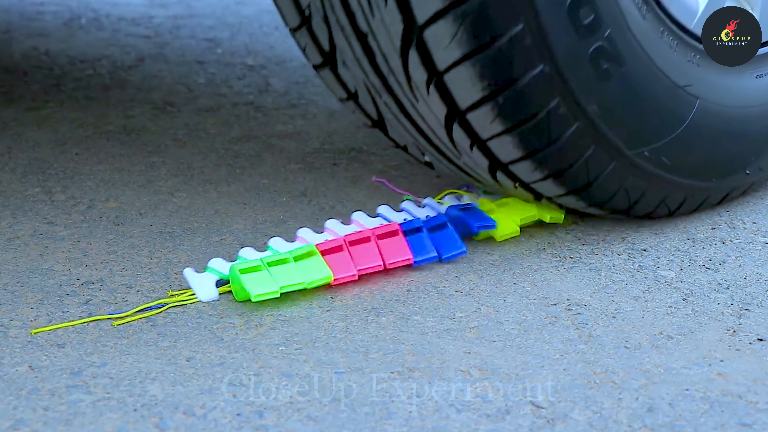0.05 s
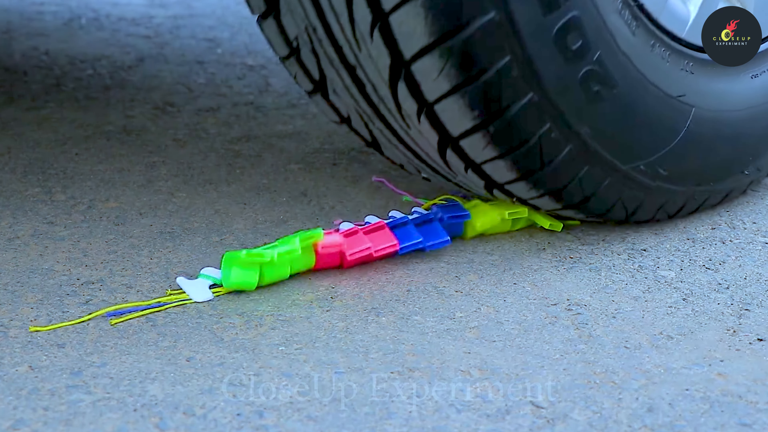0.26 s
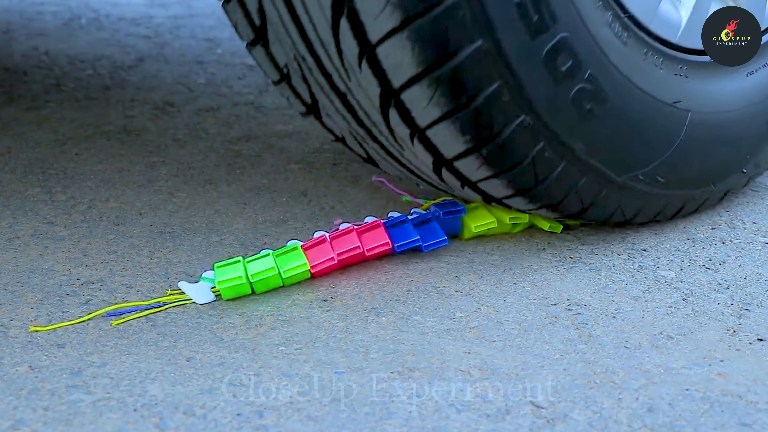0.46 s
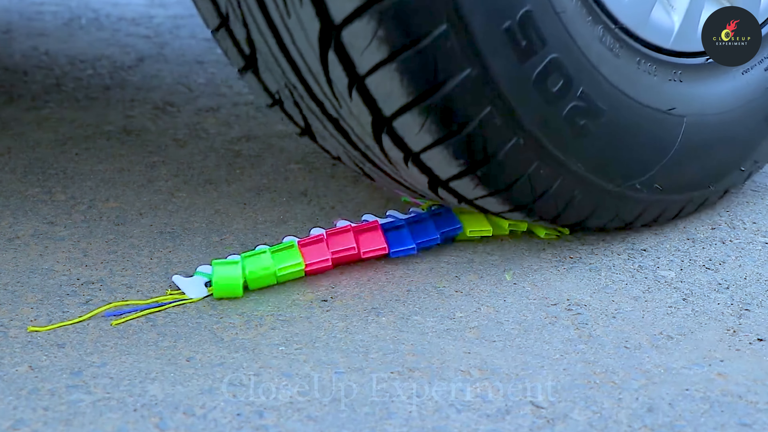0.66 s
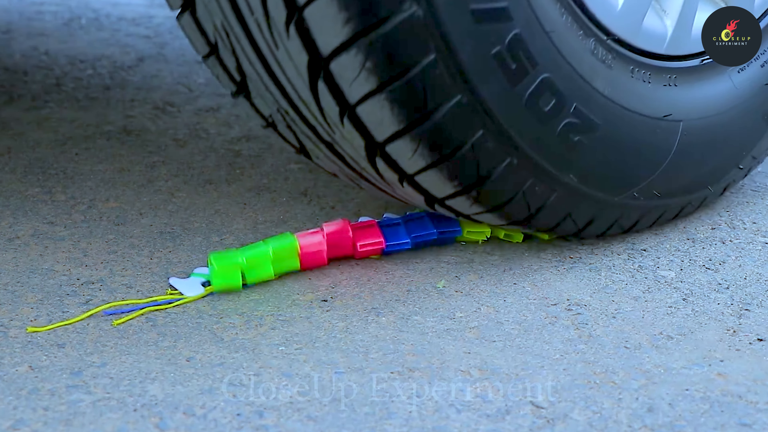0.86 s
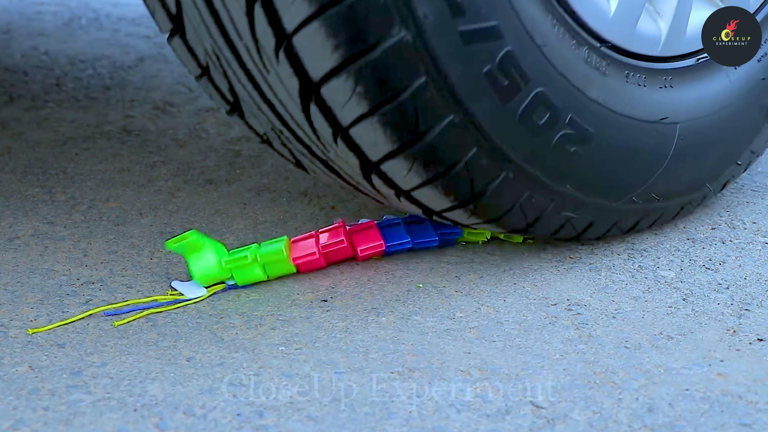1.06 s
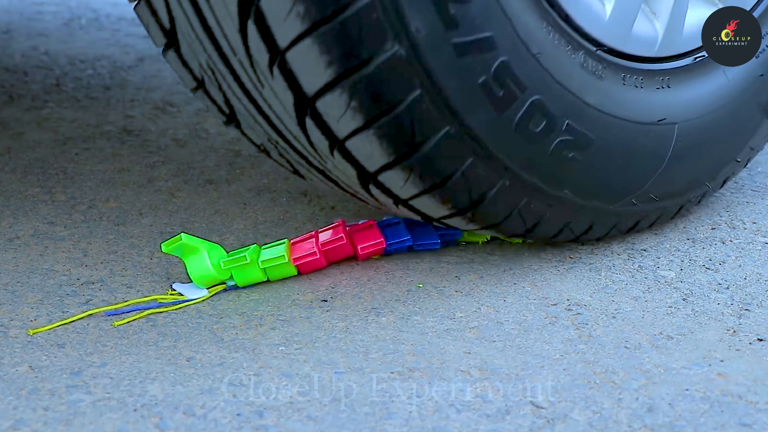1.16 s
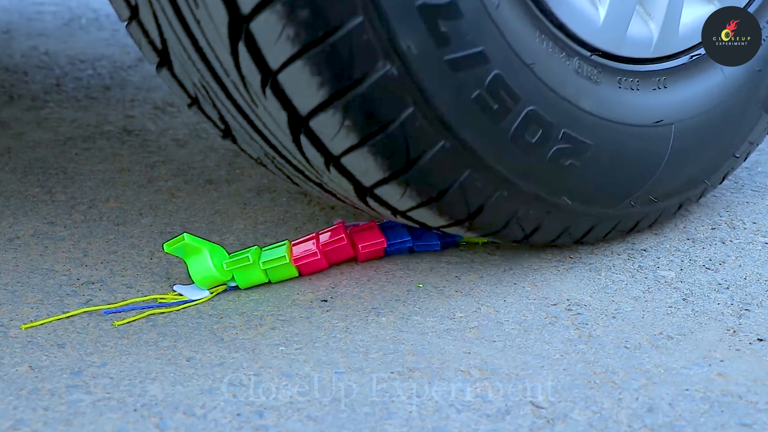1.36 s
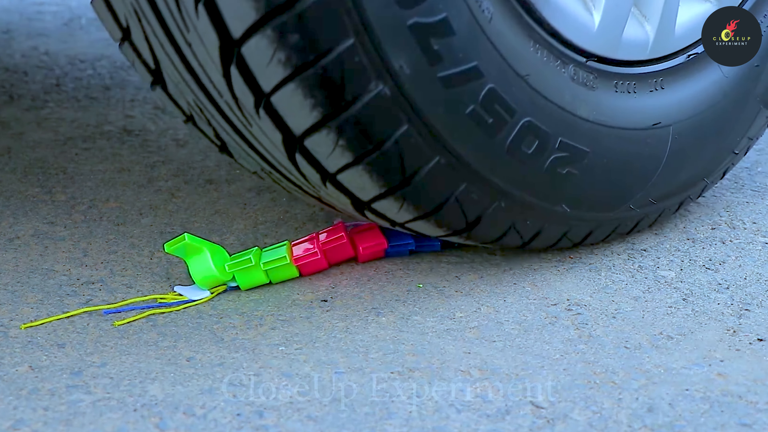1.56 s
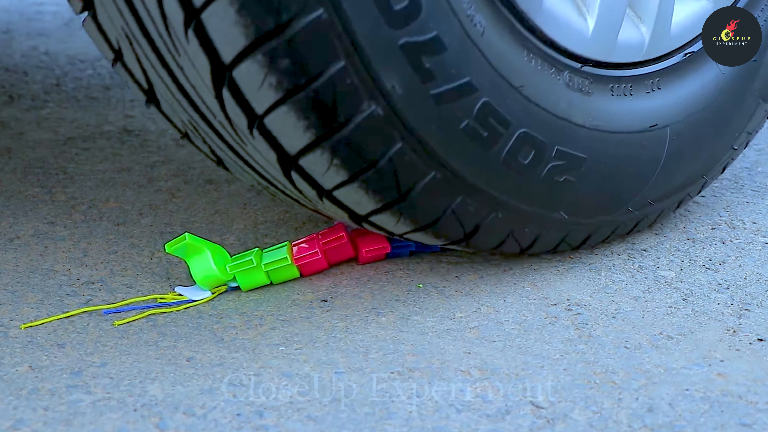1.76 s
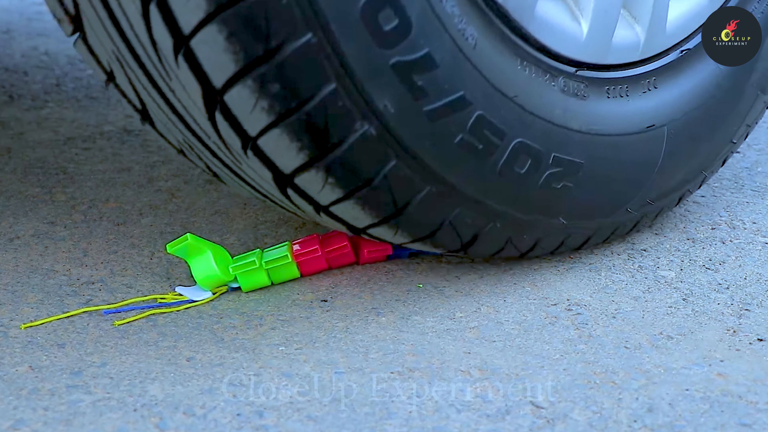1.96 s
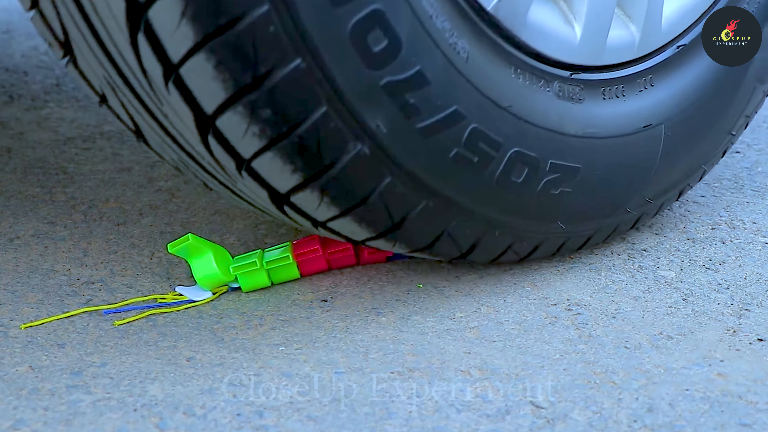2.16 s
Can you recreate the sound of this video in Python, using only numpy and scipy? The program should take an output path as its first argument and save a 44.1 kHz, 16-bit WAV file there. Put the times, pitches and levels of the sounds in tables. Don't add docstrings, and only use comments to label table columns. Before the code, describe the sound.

Hard hollow plastic pieces crack and snap sharply under a slowly rolling car tire on pavement

```python
import sys
import numpy as np
from scipy import signal
from scipy.io import wavfile
from scipy.ndimage import uniform_filter1d

SR = 44100
rng = np.random.default_rng(int(sys.argv[2]) if len(sys.argv) > 2 else 0)


def pcm_store(signal):
    levels = np.round(np.clip(np.atleast_2d(signal), -1, 1) * 32767)
    wavfile.write(sys.argv[1], SR, levels.astype(np.int16).T)


def voltage_ratio(level):
    return 10 ** (np.asarray(level, float) / 20)


N = 97020

# time_s, level_db
CHASSIS_RUMBLE = [(0.0, -68), (0.16, -71), (0.26, -18), (0.43, -52), (0.67, -43.5), (0.71, -31.5),
                  (0.77, -26.5), (0.95, -52), (0.99, -26), (1.4, -55), (1.71, -57), (1.75, -69),
                  (1.83, -71), (1.88, -45), (2.09, -48), (2.2, -59.5)]
# time_s, level_db
TREAD_LOAD = [(0.0, -47.5), (0.15, -46.5), (0.24, -40.5), (0.39, -48.5), (0.55, -46), (0.81, -44.5),
              (0.951, -42), (1.14, -33.5), (1.29, -44.5), (1.54, -50), (1.751, -48), (1.87, -43.5),
              (2.06, -46.5), (2.2, -51)]
# frequency_hz, density_db
WASH_SPECTRUM = [(15, -14), (25, -27), (113, 12), (149, -29.5), (302, 21), (641, 13.5), (688, 11.5),
                 (1270, 9.5), (6890, -6), (8960, -50.5), (15200, -120)]
# frequency_hz, t60_s
YARD_DECAY = [(100, 0.24), (400, 0.55), (2000, 0.53), (6000, 0.19)]
# start_s, level_db, pitch_hz
PIECE_KNOCKS = [(0.027, -30, 589), (0.243, -3.5, 680), (.708, -6, 1068), (.997, -9.5, 603),
                (0.505, -11, 848), (0.505, -8.5, 633), (0.89, -15, 582), (0.8906, -9, 418),
                (.252, -15.5, 171), (0.296, -22, 138), (0.516, -22.5, 183), (.722, -11.5, 150),
                (0.989, -14, 192.5), (1.743, -19, 243), (1.882, -13.5, 234), (1.904, -19, 218),
                (0.404, -30.5, 190), (0.987, -5, 704), (1.489, -16.5, 584), (1.692, -21.5, 580),
                (1.756, -10, 629), (1.992, -14, 469)]
# pitch_hz, level_db, t60_s
CARCASS_MODES = [(150, -15, 0.23), (300, -0.5, 0.19), (305.4, -2.5, 0.17), (375.6, -2.5, 0.12),
                 (394.2, -7, 0.51), (436, -8.5, 0.26), (520, 11.5, 0.016), (680, 7.5, 0.0096)]
# start_s, level_db, pitch_hz, length_s
CARCASS_BLOWS = [(.026, -34.5, 454, 0.0086), (0.243, -6.5, 363, 0.011), (0.283, -26, 383, 0.014),
                 (0.321, -40, 405, 0.023), (0.36, -43.5, 385, .012), (0.505, -5.5, 370.3, 0.011),
                 (.578, -32, 404, 0.015), (0.632, -25, 371, 0.0033), (0.703, 0, 374.5, 0.0076),
                 (0.71, 1, 384.6, .013), (.727, -9.5, 335.6, 0.014), (0.783, -26, 395, 0.017),
                 (.89, -18, 411, 0.011), (0.989, -2.5, 357, 0.014), (1.004, -9.5, 373, .012),
                 (1.062, -18.5, 373, 0.015), (1.259, -31, 307, .02), (1.485, -23.5, 473, 0.01),
                 (1.741, -8, 408, .011), (1.756, -15.5, 391, 0.0077), (1.791, -32.5, 425, 0.014),
                 (1.856, -28.5, 482, 0.02), (1.879, 2.5, 397, .016), (1.993, -26.5, 420, 0.0088),
                 (2.044, -35, 430, 0.011), (2.077, -33.5, 450, 0.011)]
# frequency_hz, density_db
SPLINTER_SPECTRUM = [(100, -35.5), (300, -14), (900, 1), (2300, 4), (3300, -7), (3900, -8), (6800, -11),
                     (7500, -11)]
# pitch_hz, width_hz, level_db
WALL_RINGS = [(4556, 350, -6), (6474, 140, -7.5)]
# start_s, level_db, shell_pitch_hz, shell_width_hz, burst_t60_s
MAIN_BREAKS = [(0.241, 0, 2630, 1240, 0.053), (0.246, -14, 2110, 945, 0.19), (0.29, 2, 3183, 150, 0.04),
               (0.294, 1.5, 3275, 150, 0.04), (0.309, -24, 3310, 120, 0.18), (0.405, -5, 2628, 695, 0.042),
               (0.419, -21.5, 2230, 400, 0.02), (.5045, -7, 2230, 908, 0.069),
               (0.705, -3, 2450, 1233, 0.13), (.719, 0.5, 2680, 507, 0.02), (.736, -16, 2687, 250, 0.16),
               (.822, -23, 2880, 203, 0.07), (.892, -13, 1500, 1480, 0.014), (0.988, -2, 2620, 930, 0.097),
               (0.997, -10, 2730, 410, 0.21), (1.489, -11.5, 2870, 847, 0.005),
               (1.743, -4.5, 3180, 1500, 0.038), (1.754, -23.5, 2700, 903, 0.067),
               (1.883, -4, 2990, 626, 0.081), (1.898, -20.5, 2910, 493, 0.064)]
# start_s, level_db, shell_pitch_hz, treble_db
SMALL_SPLINTERS = [(0.0274, -27.5, 1096, -10.5), (0.1184, -32, 1190, -1.5), (0.1757, -35.5, 2830, -2.5),
                   (0.196, -12.5, 2640, -2.5), (0.255, -19, 1970, -29), (0.267, -10, 1805, -25.5),
                   (0.2654, -11, 2550, -16.5), (0.3018, -20, 3140, -2), (0.334, -12.5, 3130, -1.5),
                   (0.351, -21.5, 3230, -8), (0.3448, -19.5, 2800, -14.5), (0.356, -12, 2900, -9),
                   (0.368, -21.5, 1900, -17), (0.4139, -5, 2200, -26), (0.423, -21, 2300, -11.5),
                   (0.405, -6.5, 4200, -22), (0.5224, -7.5, 2110, -46.5), (0.562, -21, 2500, -21),
                   (0.565, -20, 2700, -22.5), (0.5794, -17, 2080, -33), (0.6333, -18.5, 2110, 5),
                   (0.728, -9.5, 2660, -18.5), (0.779, -13.5, 1860, -27.5), (0.8, -31.5, 2860, 8),
                   (0.817, -29.5, 2880, 8), (1.0284, -14, 2730, -24), (1.1246, -29.5, 2770, 2),
                   (1.169, -26, 1225, -19), (1.1845, -22.5, 1270, -27.5), (1.3227, -20, 2530, -4),
                   (1.6926, -12, 2390, -4), (1.7425, -17.5, 1710, -2), (1.756, -3, 1385, -4),
                   (1.7682, -11.5, 2520, -31.5), (1.801, -17.5, 3150, 1.5), (1.8904, -7.5, 3070, -8.5),
                   (1.903, -15, 2950, -11.5), (1.9933, -14, 2835, -34), (2.0273, -13.5, 1780, -6.5),
                   (2.0765, -48.5, 1250, 13.5)]
# frequency_hz, density_db
SIDE_SPECTRUM = [(100, -45), (350, -20), (700, -5), (1500, -4), (2800, 3), (7000, 0)]
GATE_EDGES = [1500, 2200, 2900, 3500, 3800, 4300, 4800, 5300, 5900, 6500, 7100, 8200]


def evened(x):
    return x / np.sqrt(np.mean(x ** 2) + 1e-20)


def read(points, hz):
    f, value = np.transpose(points)
    return np.interp(np.log(hz + 1), np.log(f + 1), value)


def add(mix, s, sound):
    part = mix[max(round(s * SR), 0):][:len(sound)]
    part += sound[:len(part)]


def colour(x, points):
    half = np.log(voltage_ratio(read(points, np.fft.rfftfreq(4096, 1 / SR))))
    full = np.concatenate([half, half[-2:0:-1]])
    taps = np.fft.ifft(np.exp(np.conj(signal.hilbert(full)))).real[:2048]
    return signal.oaconvolve(x, taps / np.linalg.norm(taps))[:len(x)]


def resonate(x, hz, width_hz):
    return signal.lfilter(*signal.iirpeak(hz, hz / width_hz, SR), x)


def resonate_twice(x, hz, width_hz):
    return resonate(resonate(x, hz, width_hz), hz, width_hz)


def smooth_drift(shape, size):
    noise = rng.standard_normal(shape)
    return evened(uniform_filter1d(uniform_filter1d(noise, size=size), size=size))


def clicks(count, per_s, spread_db):
    chance, sign, size = rng.random((count, 3)).T
    return evened((chance < per_s / SR) * np.sign(sign - .5) * voltage_ratio(-spread_db * np.log(size + 1 / 10)))


def sway():
    rumble = signal.lfilter(*signal.butter(2, 70, fs=SR), rng.standard_normal(N))
    body = resonate_twice(rng.standard_normal(N), hz=102, width_hz=360)
    s, db = np.transpose(CHASSIS_RUMBLE)
    level = voltage_ratio(np.interp(np.arange(N) / SR, s, db) - 12.5)
    return level * (evened(rumble) + 1.5 * evened(body))


def grinding():
    frames, hz = N // 128 + 5, np.fft.rfftfreq(512, 1 / SR)
    real, imaginary, patches = rng.standard_normal((frames, 257, 3)).T
    patches = uniform_filter1d(patches, size=5, axis=0)
    patches = evened(uniform_filter1d(patches, size=10, axis=1))
    z = (real + 1j * imaginary) * voltage_ratio(read(WASH_SPECTRUM, hz)[:, None] + 2.34 * patches)
    wash = evened(signal.istft(z, nperseg=512, noverlap=384)[1][:N])
    grit = evened(resonate(clicks(count=N, per_s=170, spread_db=4.0), hz=2650, width_hz=190))
    s, db = np.transpose(TREAD_LOAD)
    grit_db = -6
    return voltage_ratio(np.interp(np.arange(N) / SR, s, db)) * (wash + voltage_ratio(grit_db) * grit)


def yard(x):
    hz, t, z = signal.stft(rng.standard_normal(SR), SR, nperseg=256)
    decay = voltage_ratio(-60 * t / read(YARD_DECAY, hz)[:, None])
    tail = signal.istft(z * decay, SR, nperseg=256)[1]
    return signal.fftconvolve(x, tail / np.linalg.norm(tail))[:N]


def wheel_drop():
    t = np.arange(6000) / SR
    drop_db, drop_hz, t60_s = -11, 32, .13
    return voltage_ratio(drop_db - 60 * t / t60_s) * np.sin(2 * np.pi * drop_hz * t)


def knocks():
    out, t = np.zeros(N), np.arange(6000) / SR
    t60_s, rise_s = 0.046, 0.0051
    rise = np.sin(np.pi / 2 * np.minimum(t / rise_s, 1)) ** 2
    for s, db, hz in PIECE_KNOCKS:
        pair = np.sin(2 * np.pi * hz * t) + .5 * np.sin(2 * np.pi * 1.1 * hz * t)
        add(out, s - .001, voltage_ratio(db + 2.5 - 60 * t / t60_s) * pair * rise)
    add(out, .705, wheel_drop())
    return out


def thump(db, hz, length):
    t = np.arange(14000) / SR
    ring_db, wobble_db, rise_s = -16, 5, 0.0019
    round_trip_s, return_db, return_rise = .023, -11, 1.126
    wobbles = smooth_drift((len(CARCASS_MODES), len(t)), size=350)
    out = np.zeros(len(t))
    for (mode_hz, mode_db, t60), wobble in zip(CARCASS_MODES, wobbles):
        detune, uneven = 2 * rng.random(2) - 1
        level = voltage_ratio(ring_db + mode_db + 2.2 * uneven + wobble_db * wobble - 60 * t / t60)
        out += level * np.sin(2 * np.pi * mode_hz * (1 + 0.054 * detune) * t)
    out *= np.minimum(t / rise_s, 1)
    u = t[t < length]
    swell = np.sin(np.pi * u / length) ** 1.64
    for k in range(3):
        pitch_hz = hz * return_rise ** min(k, 1)
        add(out, k * round_trip_s, voltage_ratio(k * return_db) * swell * np.sin(2 * np.pi * pitch_hz * u))
    return voltage_ratio(db) * out


def crack(db, hz, width_hz, t60, treble_db, rise):
    t = np.arange(8000) / SR
    width_hz = max(width_hz, 40)
    burst = clicks(count=len(t), per_s=9000, spread_db=2)
    burst[round(rise * SR)] = 7
    growth = voltage_ratio(-30 * np.maximum(1 - t / rise, 0))
    decay = voltage_ratio(-60 * np.maximum(t - rise, 0) / max(t60, .008))
    shape = growth * decay
    broad_db, shell_db = -3 + 4 * np.log2(width_hz / 700), -1
    shell = resonate(resonate(burst, hz, width_hz), hz, 2 * width_hz)
    parts = [(broad_db, colour(burst, SPLINTER_SPECTRUM)), (shell_db, shell)]
    for wall_hz, wall_width_hz, wall_db in WALL_RINGS:
        parts.append((treble_db + wall_db, resonate_twice(burst, wall_hz, wall_width_hz)))
    energy = np.linalg.norm(shape) / np.sqrt(len(t))
    return sum(voltage_ratio(db + part_db - 4.0) * energy * evened(x * shape) for part_db, x in parts)


def debris(stress):
    clumps = smooth_drift(N, size=200)
    shards = colour(clicks(count=N, per_s=2400, spread_db=7.0), SPLINTER_SPECTRUM)
    debris_db, clump_db = -25.5, 3
    return voltage_ratio(debris_db) * stress * shards * voltage_ratio(clump_db * clumps)


def breaks():
    out, stress = np.zeros(N), np.zeros(N)
    stress_t60_s = 0.11
    fade = voltage_ratio(-60 * np.arange(SR) / SR / stress_t60_s)
    # treble_db, rise_s
    rows = [(*row, -13, 0.0072) for row in MAIN_BREAKS]
    for s, db, hz, treble_db in SMALL_SPLINTERS:
        rows.append((s, db, hz, 278, 0.012, treble_db, .002))
    for s, db, *rest in rows:
        add(out, s - rest[-1], crack(db, *rest))
        add(stress, s, voltage_ratio(db) * fade)
    for s, *blow in CARCASS_BLOWS:
        add(out, s, thump(*blow))
    return out + debris(stress)


def scene():
    hits = breaks() + knocks()
    yard_db, side_db = -18, -24
    mid = hits + voltage_ratio(yard_db) * yard(hits) + grinding() + sway()
    smear = rng.standard_normal(600) * voltage_ratio(-60 * np.arange(600) / 600)
    smeared = signal.oaconvolve(hits, smear / np.linalg.norm(smear))[:N]
    side = voltage_ratio(side_db) * colour(smeared, SIDE_SPECTRUM)
    return np.array([mid + side, mid - side])


def gate(x):
    under_db, floor_db, chance_db = -25, -69, 4.0
    hz, t, z = signal.stft(x, SR, nperseg=512, noverlap=384)
    power = uniform_filter1d((abs(z) ** 2).mean(0), size=3, axis=1)
    whole_db = 10 * np.log10(power[hz > GATE_EDGES[0] / 2].sum(0) + 1e-14)
    luck = rng.standard_normal((len(t) // 10 + 1, len(GATE_EDGES)))
    luck = chance_db * np.repeat(luck, 10, axis=0)[:len(t)]
    keep = np.ones(power.shape)
    for k, (lo, hi) in enumerate(zip(GATE_EDGES, GATE_EDGES[1:])):
        band = (hz >= lo) & (hz < hi)
        level_db = 10 * np.log10(power[band].sum(0) + 1e-14) + luck[:, k]
        margin_db = level_db - np.maximum(whole_db + under_db, floor_db)
        keep[band] = np.clip(margin_db / 2 + .5, .003, 1) * voltage_ratio(0.85 * luck[:, k])
    return signal.istft(z * keep, SR, nperseg=512, noverlap=384)[1][:, :N]


def roll_off(x):
    return signal.sosfilt(signal.butter(12, 7040, fs=SR, output="sos"), x)


def record(dry):
    notch_hz, notch_width_hz, edge_hz = 5560, 210, 7000
    knee, ceiling, soften_hz = 1.3, .975, 10000
    x = signal.lfilter(*signal.iirnotch(notch_hz, notch_hz / notch_width_hz, SR), dry)
    x = knee * np.tanh(x / knee)
    lowpass = signal.firwin(255, edge_hz, window=("kaiser", 10), fs=SR)
    x = signal.oaconvolve(x, lowpass[None], "same")
    clipped = np.clip(gate(x), -ceiling, ceiling)
    mix = signal.filtfilt(*signal.butter(3, soften_hz, fs=SR), clipped)
    return roll_off(mix)


dry = scene()
out = record(dry)
pcm_store(out)
```